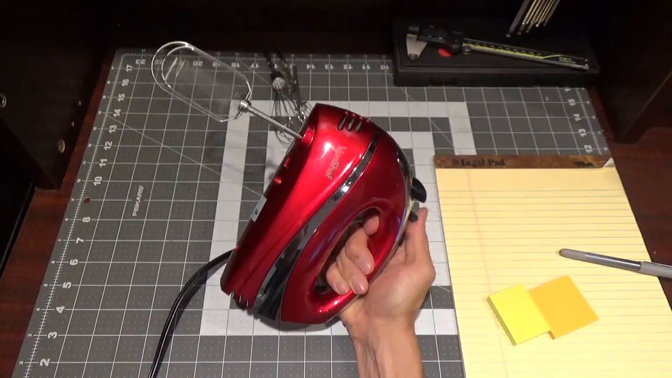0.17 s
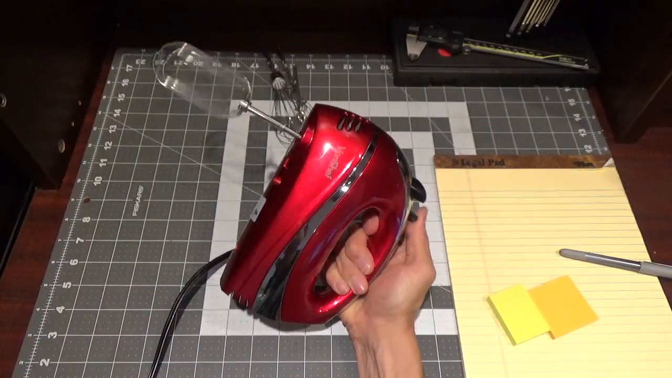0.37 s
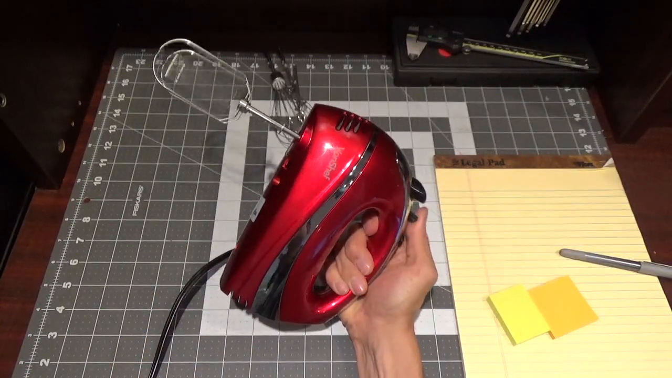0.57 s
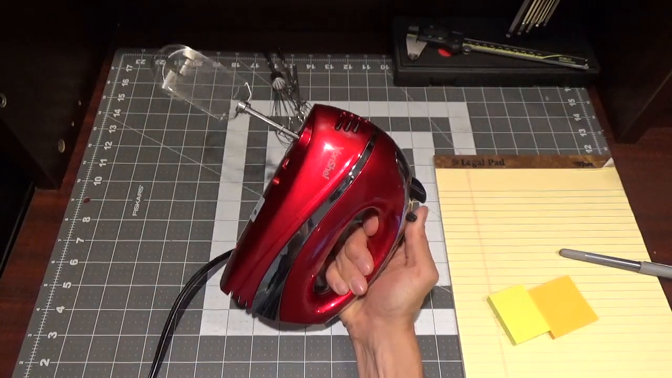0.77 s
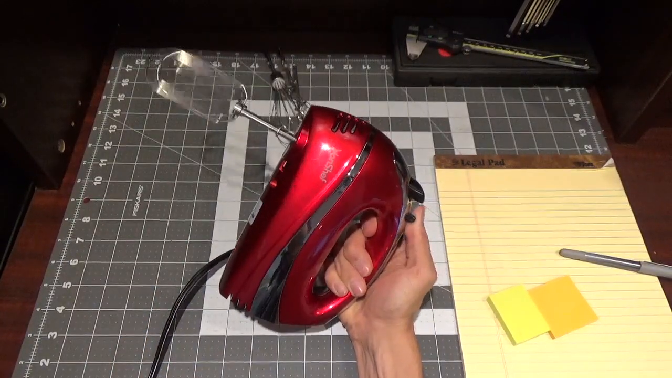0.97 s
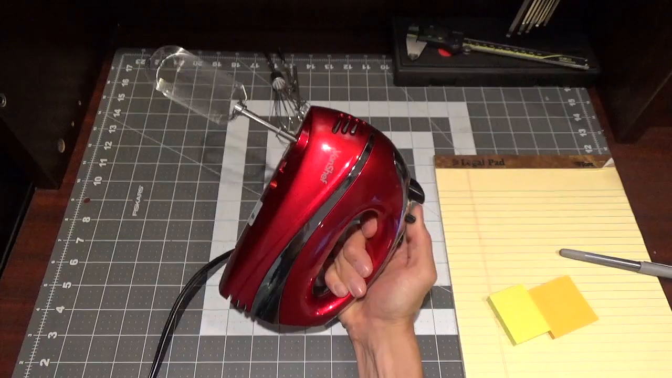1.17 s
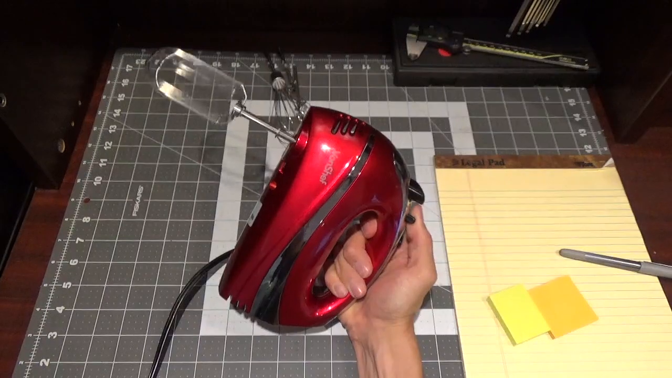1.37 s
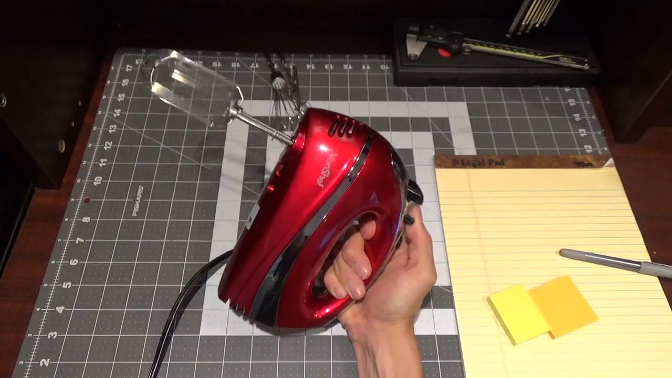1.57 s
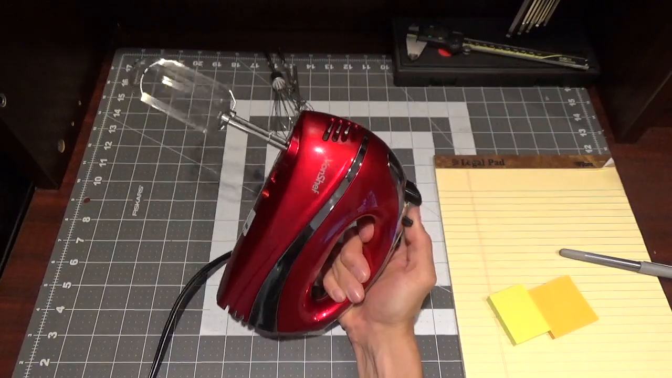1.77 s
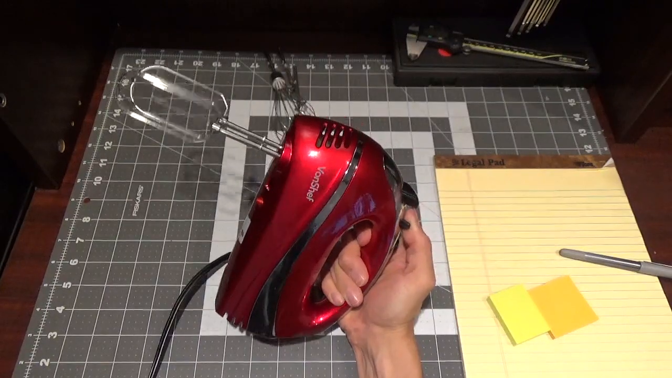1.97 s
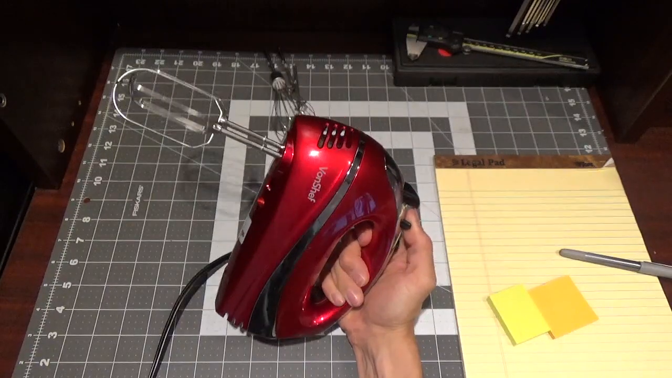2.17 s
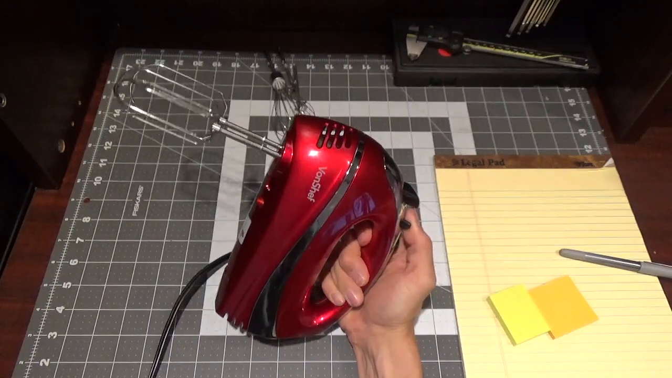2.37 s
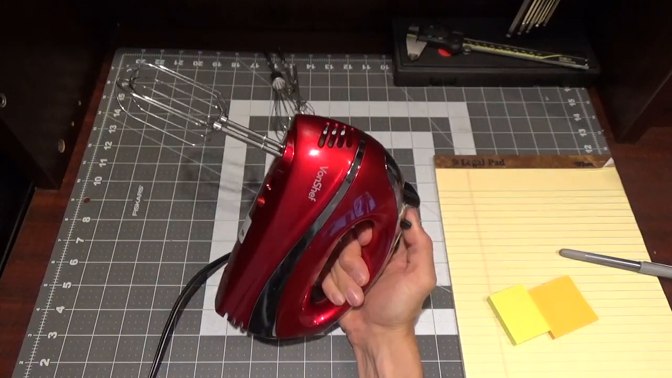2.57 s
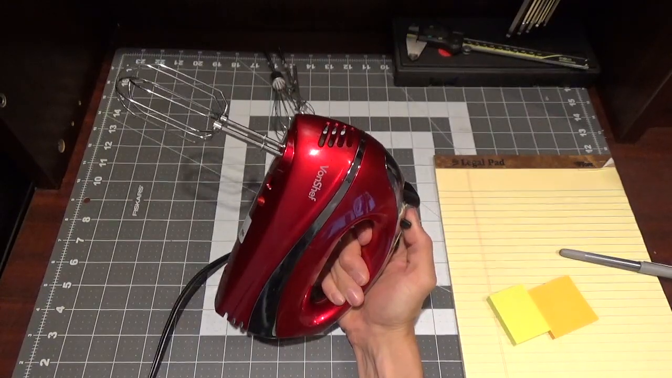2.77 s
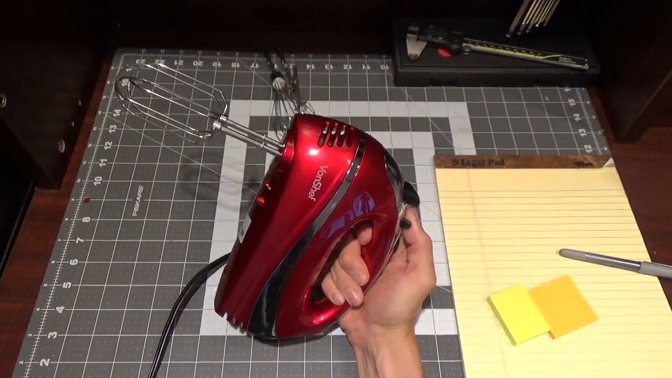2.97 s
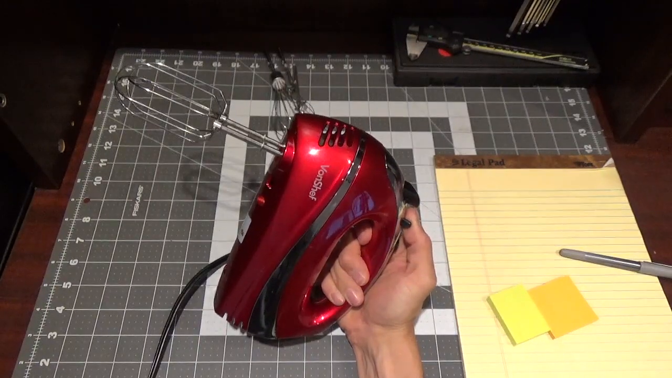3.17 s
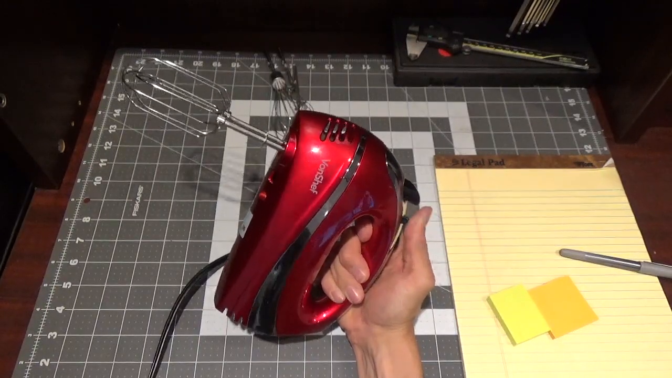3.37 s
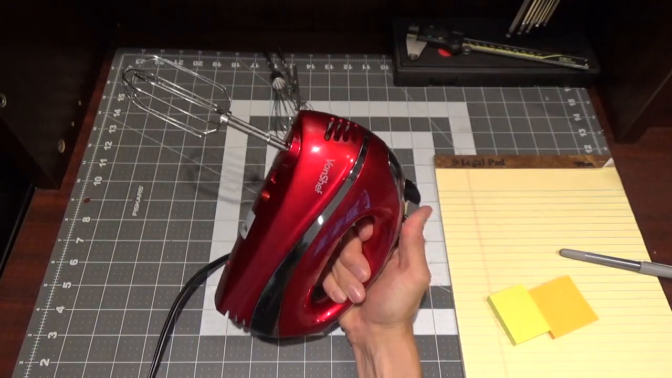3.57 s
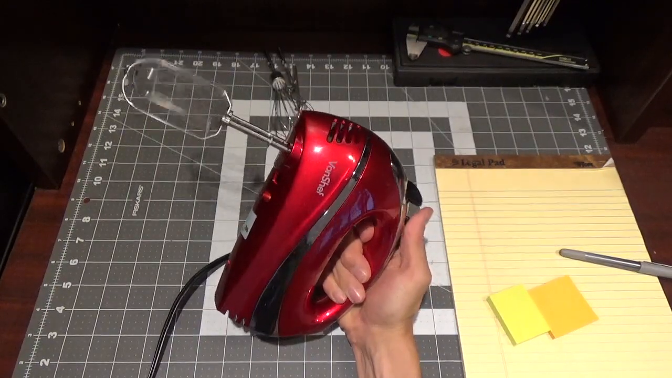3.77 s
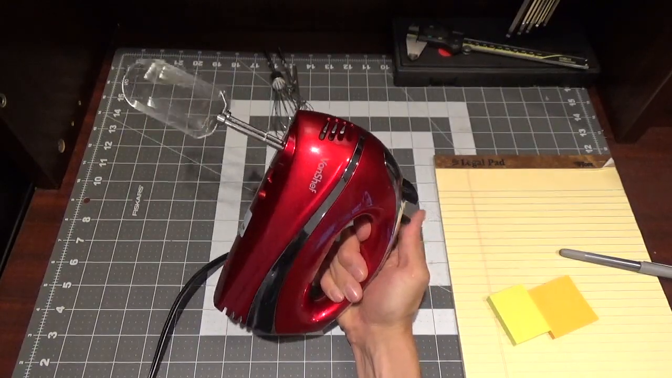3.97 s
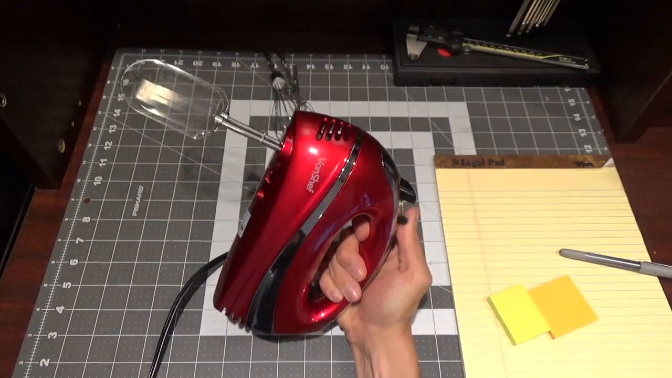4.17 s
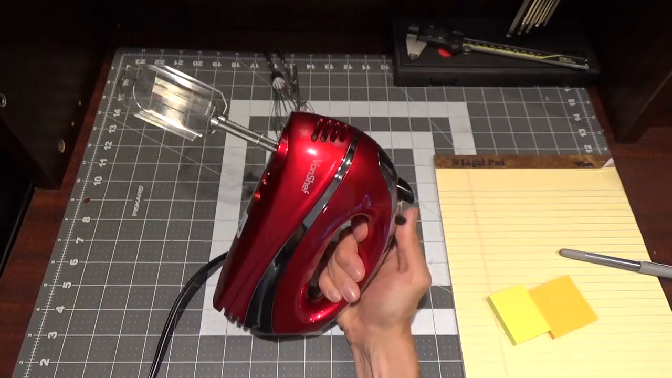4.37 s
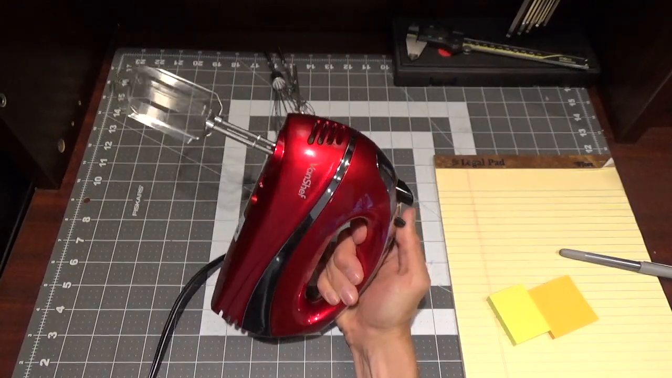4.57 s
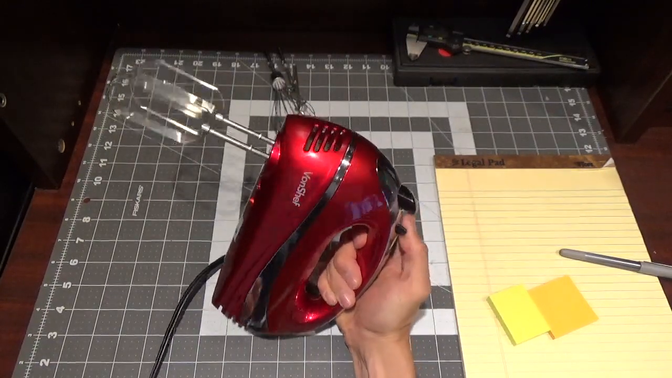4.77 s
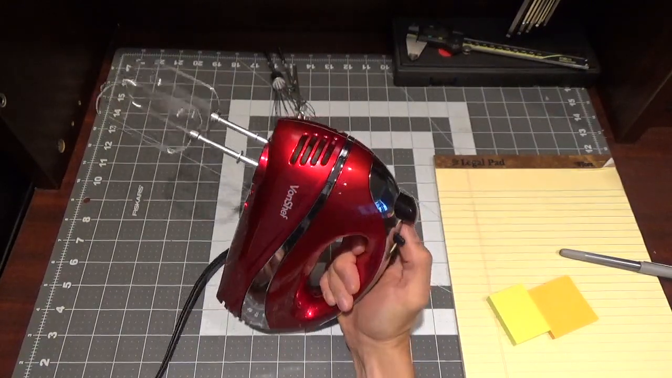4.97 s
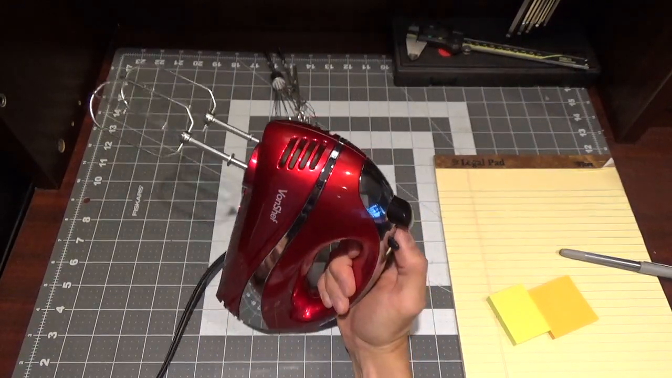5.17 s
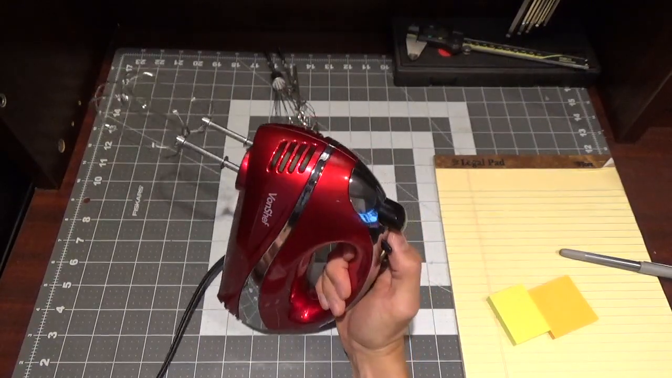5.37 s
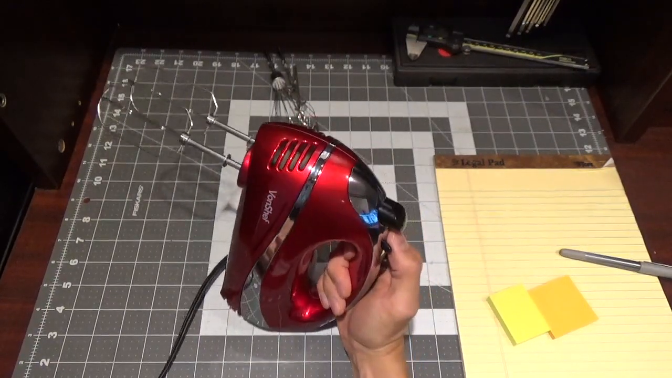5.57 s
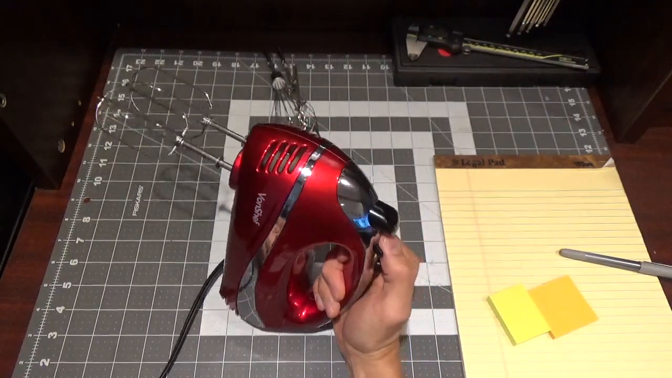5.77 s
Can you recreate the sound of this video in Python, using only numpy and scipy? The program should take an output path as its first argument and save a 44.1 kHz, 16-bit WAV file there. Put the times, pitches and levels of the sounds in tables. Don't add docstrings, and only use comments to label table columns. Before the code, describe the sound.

Closely miked mixer motor: a steady high whir with fan noise, a small switch click, then a long falling whine with gear rattle and metallic ticks. Quiet room tone follows, with a light hand touch. A loud snap brings a buzzing, rising burst, more clicks, and a second falling whine ending in low rattle and a dull bump.

```python
import sys
import numpy as np
from scipy import signal
from scipy.fft import rfft, irfft, next_fast_len
from scipy.io import wavfile
from scipy.ndimage import uniform_filter1d

SR = 44100
rng = np.random.default_rng(int(sys.argv[2]) if len(sys.argv) > 2 else 0)


def unload_audio(sound):
    columns = np.transpose(np.atleast_2d(sound))
    steps = np.round(np.clip(columns, -1, 1) * 32767)
    wavfile.write(sys.argv[1], SR, steps.astype(np.int16))


def ratio(d):
    e = np.asarray(d, float) / 20
    return 10 ** e


N = 257226

# frequency in Hz, density in dB per Hz.
ROOM_SPECTRUM = [(12, -61), (20, -39), (43, 5.5), (86, -10.5), (129, 0), (151, -9.5), (243, -2.5),
                 (473, -8.5), (3130, -15), (3380, -22), (3760, -18), (10300, -24), (11500, -31),
                 (15000, -76), (22000, -120)]
# frequency in Hz, bandwidth in Hz, level in dB.
ROOM_TONES = [(120.3, 8, -72.5), (238.4, 5.2, -77), (1395, 90, -77)]
# time in s, rms level in dB, t60 in s, low edge in Hz, high edge in Hz.
SNAPS = [
    (0.667, -30.5, 0.018, 1500, 11000),
    (3.629, -44, .05, 500, 8960),
    (3.637, -16, 0.037, 900, 13700),
    (3.639, -43.5, 0.025, 900, 11100),
    (4.083, -17, .1, 1200, 11100),
    (4.109, -19, 0.035, 3500, 7700),
    (4.194, -15.5, .034, 3000, 11200),
    (4.536, -19.5, 0.075, 400, 11000),
    (4.54, -24.5, .07, 1500, 9250),
    (5.791, -49.5, .11, 60, 700),
]
# time in s, rms level in dB, t60 in s, low edge in Hz, high edge in Hz.
RUBS = [
    (3.25, -67, .12, 700, 5000),
    (3.303, -49.5, 0.083, 900, 5900),
    (3.704, -28.5, 0.13, 1500, 9400),
]
# time in s, level in dB, frequency in Hz, t60 in s.
THUMPS = [
    (.68, -38, 69, 0.19),
    (1.161, -38, 93, 0.3),
    (1.289, -34.5, 104, .2),
    (3.645, -41, 60, 0.24),
    (4.201, -48.5, 70, 0.52),
    (4.53, -38, 102.5, 0.45),
    (4.538, -24.5, 296, 0.084),
    (4.079, -20, 318, 0.047),
]
# frequency in Hz, level in dB, t60 in s.
BEATER_MODES = [(4942, -5, .2), (5950, -8, .2), (8400, .1, .1), (8620, -6, .06), (9985, -1, .2),
                (10550, -7, .12)]
# time in s, level in dB.
CLINKS = [
    (.395, -37),
    (0.926, -21),
    (1.132, -20),
    (1.162, -21),
    (1.254, -20),
    (1.392, -24),
    (4.075, -33),
    (4.105, -26),
    (4.531, -37),
    (4.55, -24),
]
# switched on in s, switched off in s, initial braking in turns per s^2.
SWITCH = [
    (-1.5997, .6605, 160.8),
    (3.6209, 4.19, 148.4),
]
BRAKE_EASES = 16.34, 1.177
# frequency in Hz, bandwidth in Hz, level in dB.
FRAME = [(584, 230, -9), (930, 230, -1), (1500, 170, -3), (1720, 230, -3), (2157, 76, 1.5), (2790, 320, 2)]
# frequency in Hz, density in dB per Hz.
BUFFET_SPECTRUM = [(12, -60), (20, -35), (59, -10), (97, 1), (112, 2.5), (144, -3.5), (220, -4), (290, -26),
                   (480, -120)]
# frequency in Hz, density in dB per Hz.
HISS_SPECTRUM = [(1470, -34.5), (2500, -23), (2900, -1), (5380, 1.5), (5840, 3.5), (6310, -0.5),
                 (9320, -1.5), (10900, -1.5), (11300, -56), (11500, -41), (15000, -72), (22000, -120)]
# frequency in Hz, bandwidth in Hz, level in dB.
SCRAPE = [(6380, 810, -39), (7450, 750, -44.5), (5470, 690, -45.5), (3380, 2700, -46), (4640, 1000, -52),
          (8220, 900, -49), (9120, 3600, -43.5)]
# frequency in Hz, bandwidth in Hz, level in dB.
RUMBLE = [(237.5, 67, -11.5), (331.8, 24, -1.5), (400, 52, -6), (475.7, 27, 6), (580.5, 66, 4),
          (700, 183, -4)]
# frequency in Hz, bandwidth in Hz, level in dB.
RATTLE = [(900, 143, -6), (1072, 78, -0.5), (1278, 58, -0.5), (1492, 108, -2.5), (1669, 73, -3),
          (1923, 180, -3.5), (2165, 78, -5), (2637, 217, -0.5), (2696, 610, -2.5), (3500, 1080, -8),
          (4180, 1200, -20)]
# level in dB at 100 turns per s, gain in dB per doubling of speed,
# stall speed in turns per s, loss in dB under full pull.
RUMBLE_LAW = (-39, 8, 39.5, 11)
RATTLE_LAW = (-37.5, 11, 1.5, 15)
# time in s, half length in s, rumble gain in dB, rattle gain in dB.
SHAKES = [
    (.0, 0.005, 26, 6),
    (0.075, 0.015, 3, -2),
    (0.69, 0.021, 2, -6),
    (0.823, 0.037, 3, 0.5),
    (1.577, 0.017, 5, 3),
    (2.165, 0.03, 5, -5.5),
    (3.682, 0.062, 20, 33.5),
    (4.035, 0.15, 1.5, 5.5),
    (4.563, 0.0093, 3, 3),
    (5.81, 0.027, 25, 9.5),
]
ORDERS_DB = {10: (-48, 13.5), 24: (-49, 9), 36: (-40, 8.5), 40: (-61, 16), 48: (-41.5, 10.5),
             60: (-43.5, 13), 72: (-41, 15.5), 84: (-46, 13), 96: (-47, 11), 108: (-48, 11), 120: (-48, 12),
             132: (-51, 12), 144: (-53, 12), 156: (-50, 12), 168: (-51, 12), 180: (-54, 12), 192: (-58, 12)}
# frequency in Hz, bandwidth in Hz, level in dB before and after the shell turns.
SHELL = [(1090, 70, -6.0, -4.8), (1350, 120, -9.8, -9.2), (1650, 70, -10.5, -5.5), (1980, 140, -14.2, -0.3),
         (2150, 90, 0.7, -25.0), (2350, 160, -4.0, -3.4), (2540, 70, 1.7, -25.0), (2760, 180, 5.2, 3.9),
         (3160, 70, -7.0, -8.0), (3360, 200, -1.4, 3.5), (3550, 600, -5.0, -2.5), (4190, 140, 2.6, 2.2),
         (4350, 200, 2.6, -1.3), (4890, 240, -6.0, -1.0), (5330, 230, -0.7, -0.1), (5730, 180, 3.9, -1.3),
         (5970, 130, 6.0, -14.9), (6240, 470, -12.1, -6.1), (7050, 600, -25.0, -1.5),
         (7270, 270, 5.5, -25.0), (7860, 150, -3.1, -25.0), (8300, 600, -0.5, -9.8), (9000, 70, -0.5, -9.8),
         (9190, 110, 0.7, -4.6), (9460, 110, -1.2, -15.9), (9850, 320, 4.4, -3.1), (10510, 70, -3.9, -25.0),
         (11340, 330, 6.0, -25.0)]
# frequency in Hz, bandwidth in Hz.
GAPS = [(1550, 120), (2400, 100), (2900, 150), (3800, 220), (4680, 150), (5100, 200), (5510, 120),
        (6480, 350), (7680, 200), (8600, 150), (9660, 150), (10250, 200)]

FLOOR_DB = -48.5
CRICKET_HZ, CRICKET_PER_S, CRICKET_DB = 3360, 21, -73
ROOM_T60_S, ROOM_DB, LEFT_DB = .2, -8.5, .5
SNAP_RISE, RUB_RISE = 0.058, 0.15
FREE_SPEED, QUICK_SHARE, QUICK_S, SLOW_S = 275.1, .7413, .2246, 1.62
PULL_DB, NO_PULL_SPEED, PULL_POWER, INRUSH_S = -22, 281, 0.99, 0.03
HUM_HZ, HUM_DB, HUM_RIPPLE, HUM_OFF_S = 120, 1, 0.51, 4.11
TURN_S, TURN_LENGTH_S = 4.75, .6
BUFFET_DB = -50.5
HISS_DB, HISS_SLOPE_DB, HISS_HUSH_DB = -41, 14, 1.5
RASP_HZ, RASP_WIDTH_HZ = 2144, 970
RASP_DB, RASP_SLOPE_DB = -25, 21.5
STANDS_SPEED = 7.5
STALL_POWER = 2.2
UNEVEN_DB, UNEVEN_SPREAD_DB, UNEVEN_SLOPE_DB = -60, 2.5, 10
WOBBLE_DB, WOBBLE_PER_S = 2.2, 24
COAST_SING_DB, TURNED_SING_DB, SING_RISE_S, SING_FADE_SPEED = 3.5, 5.5, .09, 27
SPARK_HUSH_DB = 9
AWAY_DB = -3.5
CUTOFF_HZ, ONSET_DB = 11050, 25


def rms_one(x):
    return x / np.sqrt(np.mean(x ** 2) + 1e-20)


def drift(rate):
    knots = rng.standard_normal(600)
    return np.interp(np.arange(N) / SR * rate, np.arange(600), knots)


def resonate(x, hz, width_hz):
    r = np.exp(-np.pi * abs(width_hz) / SR)
    poles = [1, -2 * r * np.cos(2 * np.pi * hz / SR), r * r]
    return signal.lfilter(np.array([1, 0, -1]) * (1 - r * r) / 2, poles, x)


def ring(clicks, hz, t60):
    r = ratio(-60 / (t60 * SR))
    w = 2 * np.pi * hz / SR
    return signal.lfilter([0, np.sin(w)], [1, -2 * r * np.cos(w), r * r], clicks + 1e-18)


def coloured(spectrum, channels):
    size = next_fast_len(N)
    hz, db = np.transpose(spectrum)
    bins_hz = np.arange(size // 2 + 1) * SR / size
    shape = ratio(np.interp(np.log(bins_hz + 1), np.log(hz), db, left=-90, right=-90))
    white = rng.standard_normal((channels, size))
    return rms_one(irfft(rfft(white) * shape, size)[:, :N])


def background():
    shared, left, right = coloured(ROOM_SPECTRUM, channels=3)
    chirp_phase = 2 * np.pi * np.cumsum(CRICKET_PER_S * (1 + 0.062 * drift(7.2))) / SR
    throb = np.maximum(np.sin(chirp_phase), 0) ** 2
    cricket = ratio(CRICKET_DB) * rms_one(resonate(rng.standard_normal(N), CRICKET_HZ, 90) * throb)
    tones = sum(ratio(db) * rms_one(resonate(shared, hz, w)) for hz, w, db in ROOM_TONES)
    air = ratio(FLOOR_DB) * (0.25 * shared + 0.23 * np.array([left, right]))
    return air + cricket + tones


def room(x):
    t = np.arange(round(.4 * SR)) / SR
    echoes = rng.standard_normal((2, len(t))) * ratio(-60 * t / ROOM_T60_S) * (t > .0015)
    echoes = echoes / np.sqrt(np.sum(echoes ** 2, axis=1, keepdims=True))
    thin = signal.sosfilt(signal.butter(1, 150, "high", fs=SR, output="sos"), x)
    return signal.fftconvolve(thin[None], echoes, axes=1)[:, :N]


def handling():
    out, t, white = np.zeros(N), np.arange(N) / SR, rng.standard_normal(N)
    bursts = [(SNAP_RISE, *row) for row in SNAPS] + [(RUB_RISE, *row) for row in RUBS]
    for rise, s, db, t60, low_hz, high_hz in bursts:
        near = slice(round((s - .1) * SR), round((s + .3) * SR))
        band = signal.butter(2, [low_hz, high_hz], "band", fs=SR, output="sos")
        burst = rms_one(signal.sosfilt(band, white[near]))
        age = t[near] - s
        swell = np.exp(-.5 * (age / (rise * t60)) ** 2)
        out[near] += ratio(db) * burst * np.where(age < 0, swell, ratio(-60 * age / t60))
    for s, db, hz, t60 in THUMPS:
        age = np.maximum(t - s, 0)
        soft_start = np.tanh(age / 0.0044)
        out += ratio(db - 60 * age / t60) * np.sin(2 * np.pi * hz * age) * soft_start
    return out


def beaters():
    at = [round(s * SR) for s, db in CLINKS]
    out = np.zeros(N)
    spread_db = rng.normal(0, 2.5, (len(at), len(BEATER_MODES)))
    for k, (hz, level_db, t60) in enumerate(BEATER_MODES):
        clicks = np.zeros(N)
        clicks[at] = ratio(np.array(CLINKS)[:, 1] + level_db + spread_db[:, k])
        out += ring(clicks, hz, t60)
    return out


def rotor():
    t, speed, on = np.arange(N) / SR, np.zeros(N), np.zeros(N, bool)
    for on_s, off_s, brake in SWITCH:
        run = np.clip(t, on_s, off_s) - on_s
        coast = np.maximum(t - off_s, 0)
        climb = 1 - QUICK_SHARE * np.exp(-run / QUICK_S) - (1 - QUICK_SHARE) * np.exp(-run / SLOW_S)
        lost = coast * (brake - coast * (BRAKE_EASES[0] + coast * BRAKE_EASES[1]))
        speed = np.where(t > on_s, np.maximum(FREE_SPEED * climb - lost, 0), speed)
        on = on | ((t > on_s) & (t < off_s))
    return speed, on


def load(speed, on):
    first_spell = np.arange(N) < SWITCH[0][1] * SR
    age = np.maximum(np.arange(N) / SR - SWITCH[1][0], 0) + first_spell
    inrush = np.tanh((age / INRUSH_S) ** 4)
    return on * inrush * np.clip(1 - speed / NO_PULL_SPEED, 1e-4, 1) ** PULL_POWER


def windings(speed, share):
    turn = 2 * np.pi * np.cumsum(speed) / SR
    pull = ratio(PULL_DB) * share * (np.arange(N) < HUM_OFF_S * SR)
    mains = 2 * np.pi * HUM_HZ * np.arange(N) / SR
    slots = np.sin(12 * turn) + 0.33 * np.sin(24 * turn)
    slots += 0.26 * np.sin(11 * turn) + 0.13 * np.sin(13 * turn)
    source = 2.5 * pull * (1 + HUM_RIPPLE * np.sin(mains)) * slots * ratio(2.5 * drift(90))
    hum = ratio(HUM_DB - 10) * pull ** 1.11 * (pull > ratio(-70)) * (np.sin(mains) + 0.26 * np.sin(2 * mains))
    return hum + sum((-1) ** k * ratio(db) * resonate(source, hz, w) for k, (hz, w, db) in enumerate(FRAME))


def turned():
    return np.clip((np.arange(N) / SR - TURN_S) / TURN_LENGTH_S + .5, 0, 1)


def buffet(speed):
    return ratio(BUFFET_DB + 3.6 * drift(23)) * (speed / 250) ** 1.1 * coloured(BUFFET_SPECTRUM, channels=1)[0]


def fan_hiss(speed, share):
    level_db = HISS_DB + HISS_SLOPE_DB * np.log2(np.maximum(speed, .1) / 100)
    return ratio(level_db - HISS_HUSH_DB * share + 0.23 * drift(13)) * coloured(HISS_SPECTRUM, channels=1)[0]


def vents(speed):
    band = resonate(rng.standard_normal(N), RASP_HZ, RASP_WIDTH_HZ)
    band = resonate(band, RASP_HZ, RASP_WIDTH_HZ)
    level_db = RASP_DB + RASP_SLOPE_DB * np.log2(np.maximum(speed, 1) / 250)
    return rms_one(band) * ratio(level_db + 1.0 * drift(18))


def scrape(speed):
    white = rng.standard_normal(N)
    rub = sum(ratio(db) * rms_one(resonate(resonate(white, hz, w), hz, w)) for hz, w, db in SCRAPE)
    rub = rub * ratio(3.7 * turned()) * np.tanh(speed / 45) ** 2.88
    dry_rub = ratio(-57.5) * rms_one(resonate(white, 4900, 9000)) * np.tanh(speed / STANDS_SPEED)
    return rub + dry_rub


def gear(modes, speed, grain_db, flicker_db):
    strikes = rng.random(N) < 40 * (speed + 30) / SR
    knocks = strikes * ratio(grain_db * np.minimum(rng.exponential(1, N), 4))
    knocks = knocks * rng.choice([-1, 1], N) / np.sqrt(speed + 30)
    lumps = drift(45)
    return rms_one(sum((-1) ** k * resonate(knocks, hz, w) * ratio(db + flicker_db * (lumps + drift(14)))
                       for k, (hz, w, db) in enumerate(modes)))


def gear_gain(law, speed, share, axis):
    level_db, slope_db, stall, hush_db = law
    t = np.arange(N) / SR
    shaken_db = sum(row[axis] * np.exp(-.5 * ((t - row[0]) / row[1]) ** 2) for row in SHAKES)
    steady_db = level_db + slope_db * np.log2(np.maximum(speed, 1) / 100) - hush_db * share
    return ratio(steady_db + shaken_db) * np.tanh(speed / stall) ** STALL_POWER


def singing(speed, on):
    coasting = uniform_filter1d(1. - on, round(SING_RISE_S * SR))
    gain_db = COAST_SING_DB * coasting + TURNED_SING_DB * turned() - SPARK_HUSH_DB * load(speed, on)
    gain_db += AWAY_DB * (np.arange(N) > SWITCH[1][0] * SR)
    return ratio(gain_db) * np.tanh(speed / SING_FADE_SPEED)


def whine(speed, on):
    step = np.exp(2j * np.pi * np.cumsum(speed) / SR)
    octaves = np.log2(np.maximum(speed, 1) / 100)
    chance = rng.random((193, 2))
    strong, weak, order = np.zeros(N), np.zeros(N), np.ones(N)
    for k in range(1, 193):
        order = order * step
        if k > 110 and k not in ORDERS_DB:
            continue
        line = (order * np.exp(2j * np.pi * chance[k, 1])).real * (k * speed < 11500)
        if k in ORDERS_DB:
            level_db, slope_db = ORDERS_DB[k]
            strong += ratio(level_db + slope_db * octaves + WOBBLE_DB * drift(WOBBLE_PER_S)) * line
        else:
            weak += ratio(UNEVEN_DB + UNEVEN_SPREAD_DB * (4 * chance[k, 0] - 2)) * line
    source = strong * singing(speed, on) + weak * ratio(UNEVEN_SLOPE_DB * octaves)
    source = np.sqrt(2) * source * (speed > 5)
    for hz, width_hz in GAPS:
        source = source - .85 * resonate(source, hz, width_hz)
    turn = turned()
    return sum(resonate(source, hz, w) * (ratio(a_db) + turn * (ratio(b_db) - ratio(a_db)))
               for hz, w, a_db, b_db in SHELL)


def scene():
    room_tone = background()
    speed, on = rotor()
    share = load(speed, on)
    mixer = handling() + beaters() + windings(speed, share)
    mixer += buffet(speed) + fan_hiss(speed, share) + vents(speed) + scrape(speed)
    mixer += gear_gain(RUMBLE_LAW, speed, share, axis=2) * gear(RUMBLE, speed, grain_db=-0.5, flicker_db=1.5)
    mixer += gear_gain(RATTLE_LAW, speed, share, axis=3) * gear(RATTLE, speed, grain_db=2.5, flicker_db=0.84)
    mixer += whine(speed, on)
    return mixer * ratio([[LEFT_DB], [-LEFT_DB]]) + ratio(ROOM_DB) * room(mixer) + room_tone


def band_limit(x):
    return signal.sosfilt(signal.butter(12, 11950, fs=SR, output="sos"), x)


def record(dry):
    size = next_fast_len(N + 4096)
    kept = np.clip((CUTOFF_HZ - np.arange(size // 2 + 1) * SR / size) / 150 + .5, 0, 1)
    low = irfft(rfft(dry, size) * kept, size)[:, :N]
    level = uniform_filter1d(np.mean(dry ** 2, axis=0), 256) + 1e-12
    onset = level > np.roll(level, 600) * ratio(ONSET_DB) ** 2
    mix = low + .15 * (dry - low) * uniform_filter1d(1. * onset, 200)
    return band_limit(mix)


dry = scene()
out = record(dry)
unload_audio(out)
```